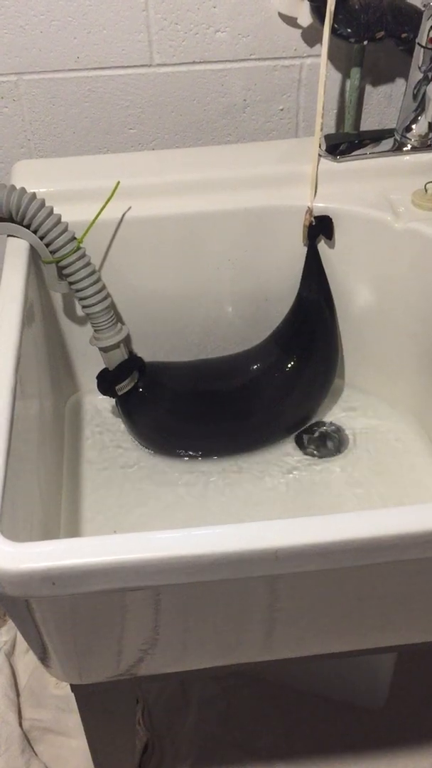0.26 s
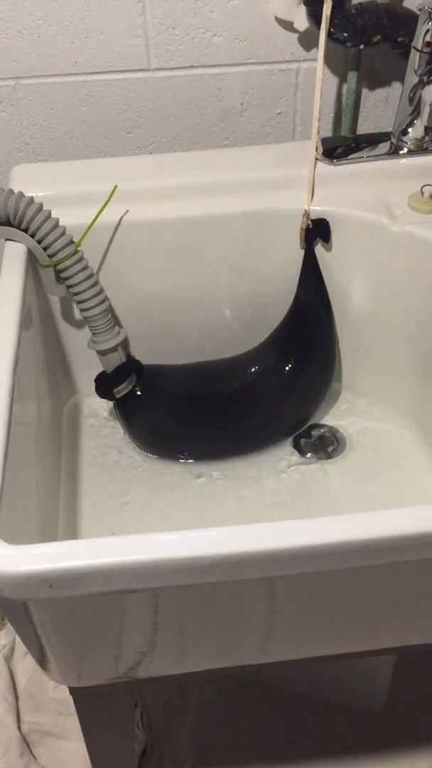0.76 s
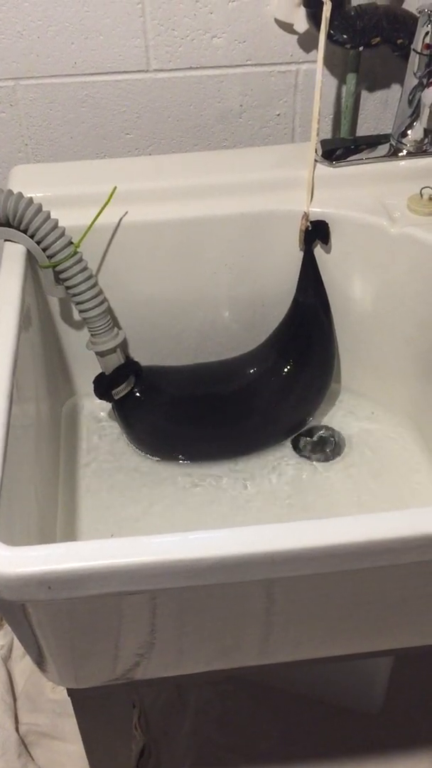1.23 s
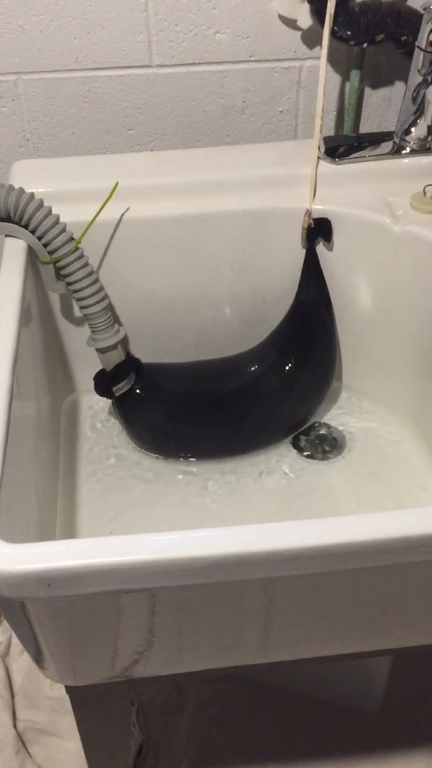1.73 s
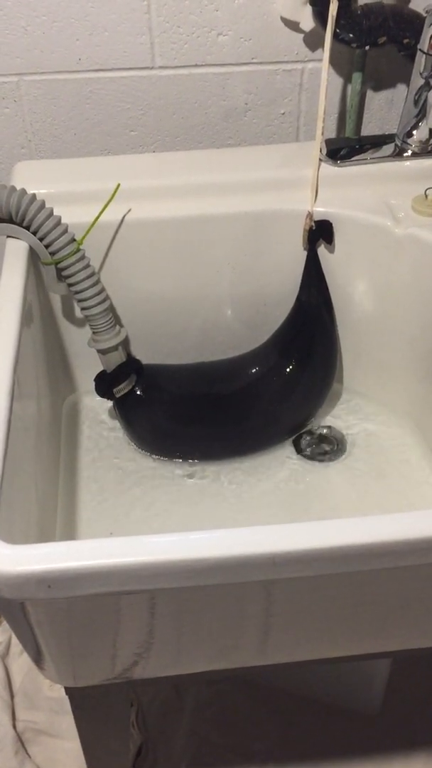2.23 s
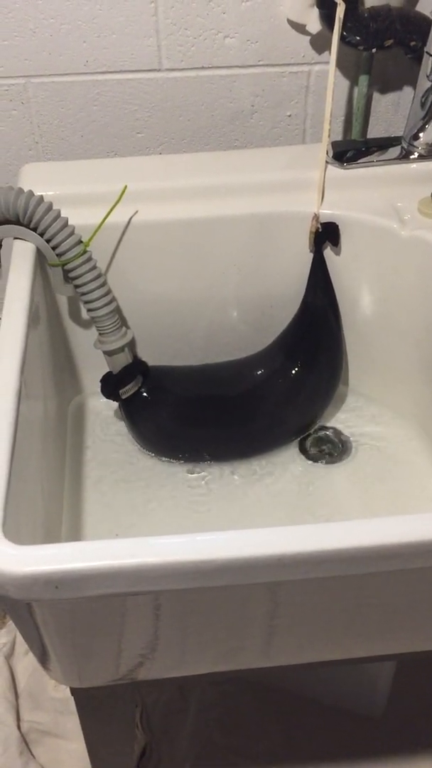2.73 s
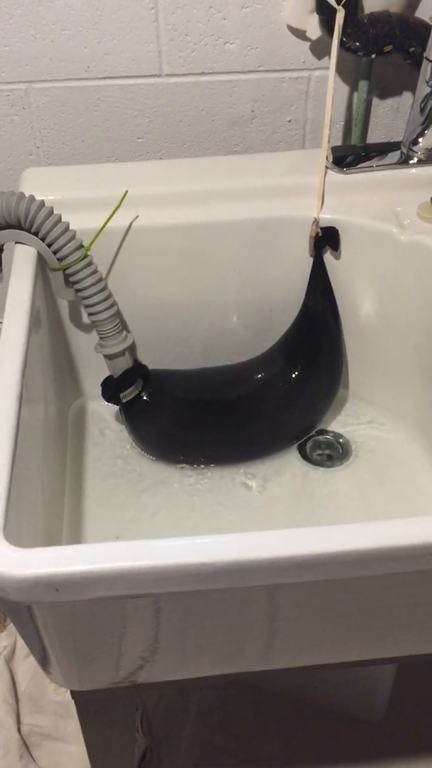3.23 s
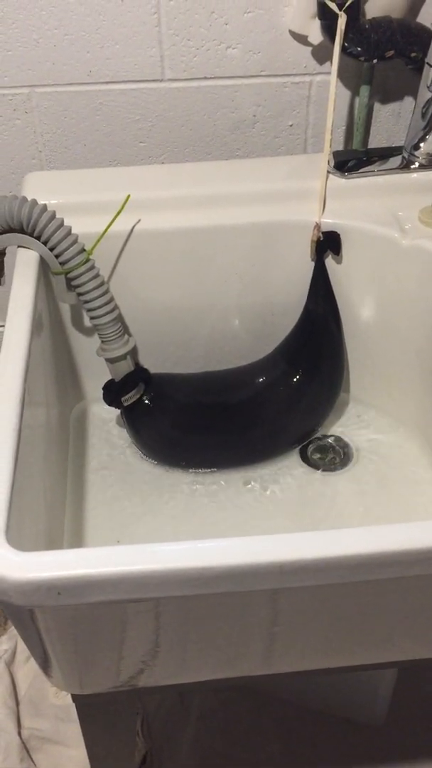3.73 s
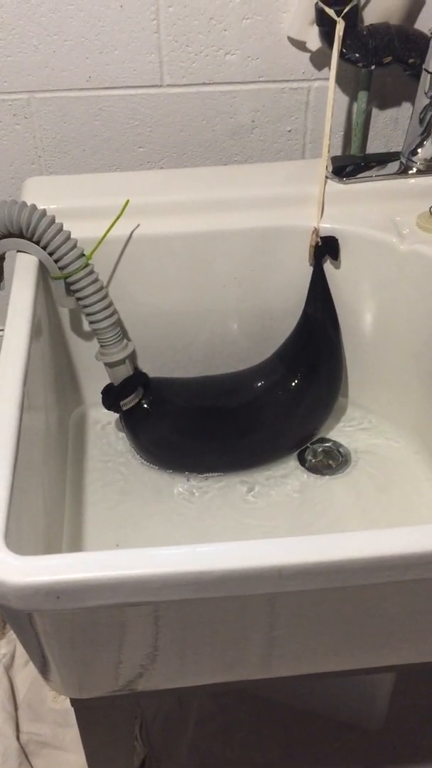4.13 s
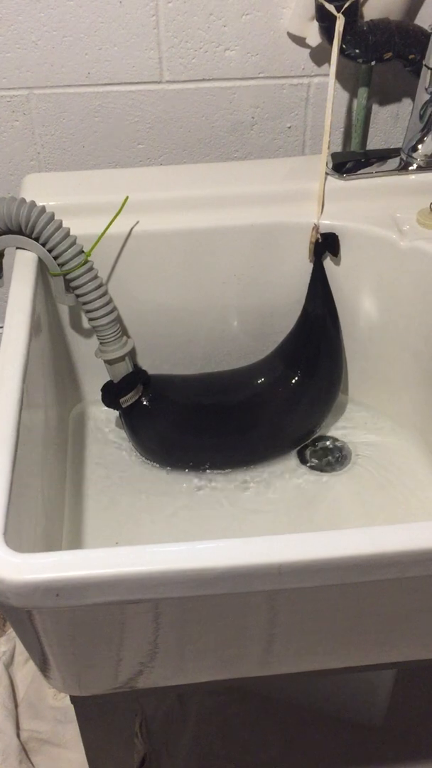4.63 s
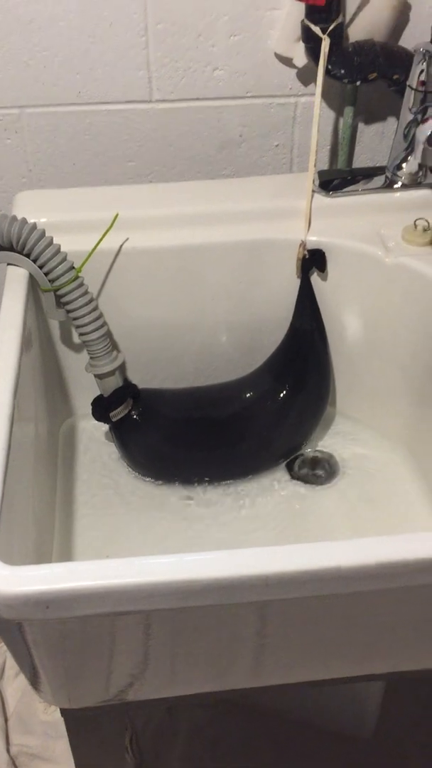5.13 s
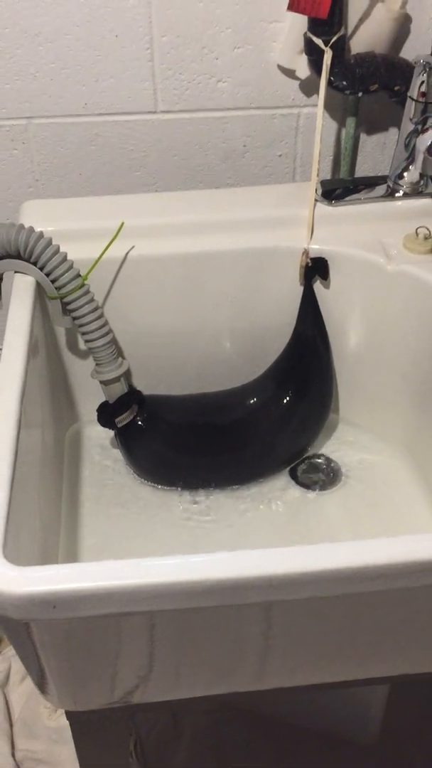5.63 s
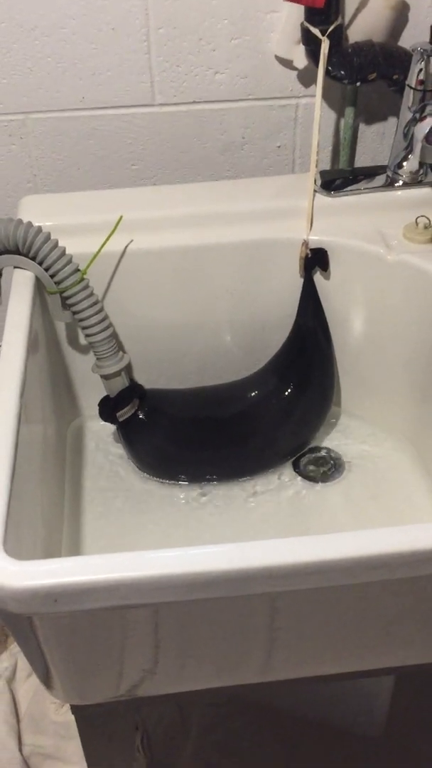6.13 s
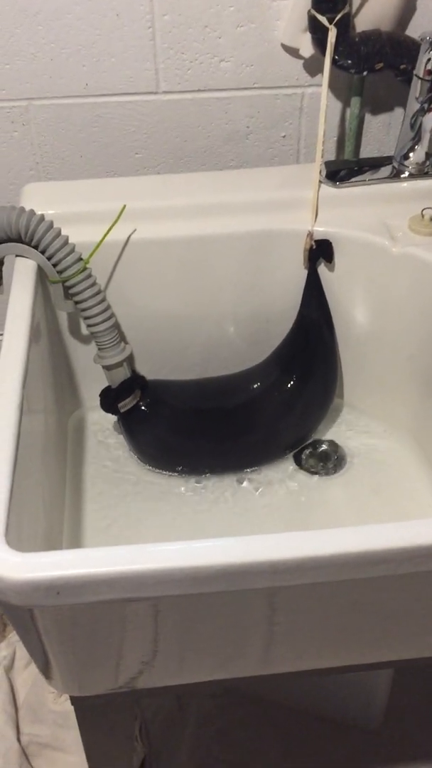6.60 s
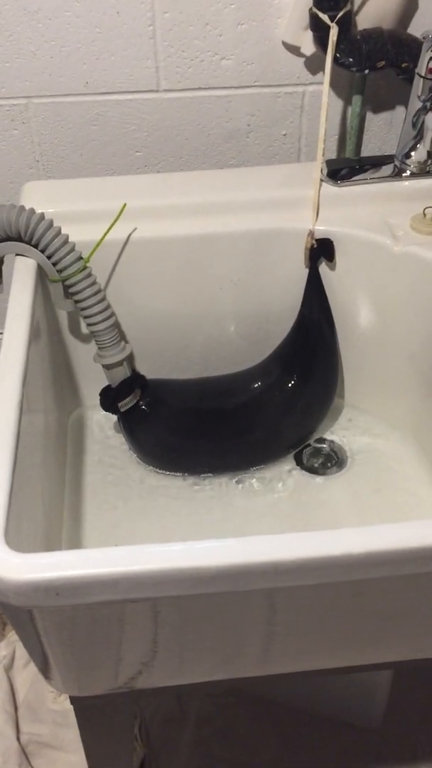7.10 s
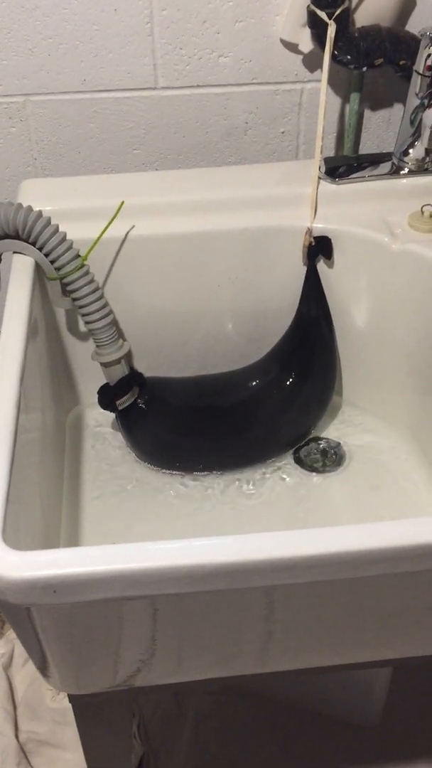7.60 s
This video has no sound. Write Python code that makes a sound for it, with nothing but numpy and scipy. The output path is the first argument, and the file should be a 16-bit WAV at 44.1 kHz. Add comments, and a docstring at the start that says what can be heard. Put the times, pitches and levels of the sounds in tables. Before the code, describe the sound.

Drain water runs fizzing from a hose into a laundry tub over a motor's bass hum, air spitting, cracking and gurgling at intervals.

```python
"""A washing machine's drain pump hums (60 Hz harmonics) and churns water; its hose trickles into a plastic sink.
From the start, faint bubbles drip and gurgle; loud plips and bursting films follow, snapping until 2.1 s.
After a sparser lull, gulps of air glug as bubble clouds near 5 s, and snaps and glugs return near 6.8 s.
Air in the hose spits through a soaked lint sock: cracks, decaying rings and rising bubble tones.
Decaying noise and fixed tub resonances ring behind the water, as plastic walls and a small masonry room."""
import sys
import numpy as np
from scipy import signal
from scipy.fft import rfft, irfft, next_fast_len
from scipy.io import wavfile
from scipy.ndimage import uniform_filter1d, map_coordinates

SR = 44100
rng = np.random.default_rng(int(sys.argv[2]) if len(sys.argv) > 2 else 0)


def materialize(psi):
    """Save the field psi as 16-bit PCM at rate SR to the path in sys.argv[1].

    A 1-D psi becomes a single channel; in a 2-D psi each row is a channel.
    """
    bounded = np.clip(np.atleast_2d(psi).T, -1, 1)
    quanta = np.round(bounded * 32767).astype(np.int16)
    wavfile.write(sys.argv[1], SR, quanta)


N = 346626  # length [samples]

# Pump harmonics: (frequency [Hz], rms level before HUM_GAIN_DB [dB])
PUMP_LINES = [(60, -63), (120, -43), (180, -72.5), (240, -69.5), (300, -65), (360, -75), (480, -75.5),
              (660, -89)]
# Chance moments when the hum and low noise partly cancel: (time [s], depth [dB])
HUM_CANCELLATIONS = [(1.12, 5), (3.08, 3), (3.32, 6), (5.58, 8), (7.43, 7), (7.66, 7)]
# Water churning in the machine: (time [s], level before CHURN_GAIN_DB [dB])
CHURN_LEVEL = [(0, -49), (.6, -54), (1.1, -47), (1.45, -52.5), (1.95, -50.5), (2.8, -53.5), (7.86, -53)]
# Running water: (time [s], level before the layer gains [dB])
TRICKLE_LEVEL = [(0, -50.5), (.7, -53), (1.15, -48), (1.6, -51.5), (2.1, -50.5), (3.3, -52.5), (4.7, -55.5),
                 (5.1, -51.5), (5.8, -56.5), (7, -54), (7.86, -55)]
# Loud single bubbles: (time [s], level before PLIP_GAIN_DB [dB], pitch [Hz])
LOUD_PLIPS = [(0.1507, -30.5, 2670), (0.247, -37, 5070), (0.2833, -32, 2430), (0.5342, -30.5, 4030),
              (0.5521, -35.5, 3300), (0.7233, -25, 4360), (0.728, -28, 2770), (1.2371, -35.5, 2755),
              (1.7918, -23.5, 2390), (1.9248, -23, 2550), (1.953, -27, 4300), (2.0366, -30.5, 2830),
              (2.0753, -28, 3410), (2.1883, -25.5, 2330), (2.3359, -32.5, 4200), (2.3703, -25.5, 2590),
              (2.441, -25.5, 4030), (3.7755, -42.5, 3570), (3.9346, -38.5, 3420), (4.0946, -46, 2220),
              (4.263, -37.5, 3980), (4.8852, -33, 2850), (5.001, -27, 2250), (5.0086, -27, 3300),
              (5.02, -24.5, 3370), (6.1037, -40.5, 1620), (6.4804, -40, 2035), (6.7469, -18, 2850),
              (6.8047, -25.5, 2640), (7.2294, -42, 970), (7.5534, -45.5, 2170)]
# Films bursting at the outlet: (time [s], crack level before CRACK_GAIN_DB [dB],
# air-pocket ring level [dB], spit relative to crack before SPIT_GAIN_DB [dB])
LOUD_SNAPS = [(0.2977, -40, -25.5, -5), (0.3065, -37.5, -31, -5), (0.317, -37.5, -27, -15),
              (0.339, -37.5, -39, -11), (0.399, -39, -25, -11), (0.411, -39, -34, -10),
              (0.5333, -41, -41, -31), (0.723, -33, -45, -14), (0.728, -35, -44, -20),
              (0.7576, -35, -29.5, -24), (0.763, -30, -40, -25), (0.7746, -34.5, -31, -16),
              (0.793, -47, -25, -20), (0.8253, -35, -24, -23), (0.8314, -39.5, -36, -5),
              (0.853, -38, -37, -20), (0.8591, -35.5, -20, 1), (0.9979, -27.5, -23, -22),
              (1.0023, -36, -21.5, -5), (1.285, -44, -22, -15), (1.298, -45, -32, -21),
              (1.3138, -35.5, -27, -13), (1.3228, -36, -40, -22), (1.363, -38, -32, -18),
              (1.3794, -42.5, -42, -23), (1.4794, -42, -26.5, -23), (1.791, -33.5, -30, -19),
              (1.9222, -37, -26, -17), (1.952, -40, -50, -20), (1.9868, -41, -30, -2),
              (2.0061, -36, -28.5, -27), (2.0906, -40.5, -31, -24), (4.8884, -42, -31.5, -18),
              (4.9799, -33.5, -20.5, -8), (4.9927, -27, -27, -6), (4.998, -33.5, -36, 1),
              (5.0123, -42, -30, -2), (6.7945, -33.5, -28, -5.5), (6.802, -30, -31, -13),
              (6.8976, -38, -33, 0), (6.9033, -47, -24.5, 8)]
# Spells of sputtering air: (start [s], end [s], small-snap level before CRACK_GAIN_DB [dB],
# small-glug level before GLUG_GAIN_DB [dB], glug centre [Hz])
SPUTTER_SPELLS = [(0.283, 0.434, -55, -60, 2140), (0.746, 0.873, -43.5, -49, 2400),
                  (1.049, 1.45, -54, -47, 1650), (1.901, 2.14, -53, -46, 2410),
                  (3.722, 4.424, -77, -58.5, 3310), (5.09, 5.249, -68, -48.5, 1860),
                  (5.601, 5.69, -59, -45, 2230), (6.047, 6.601, -64, -55, 2015),
                  (6.801, 7.618, -68, -52, 2340)]
# Gulps breaking into bubble clouds: (time [s], level before GLUG_GAIN_DB [dB], centre [Hz], spread [octaves])
LOUD_GLUGS = [(0.9, -38, 1920, 0.17), (1.644, -46, 1930, 0.48), (1.863, -40.5, 1560, 0.17),
              (2.043, -40.5, 2420, 0.32), (2.272, -44, 1057, 0.47), (2.301, -44, 2130, 0.53),
              (4.931, -38.5, 2080, 0.29), (4.997, -30.5, 2610, 0.43), (5.066, -31, 1840, 0.183),
              (5.109, -37.5, 2080, 0.15), (5.185, -37.5, 1850, 0.16), (5.301, -38.5, 1390, 0.54),
              (5.353, -35.5, 1480, 0.31), (5.569, -33.5, 1660, 0.24), (6.83, -37, 2530, 0.23),
              (6.9, -33.5, 2640, 0.23), (6.997, -38.5, 1220, 0.33), (7.028, -39, 1906, 0.13),
              (7.323, -39, 1377, 0.36), (7.342, -39.5, 1520, 0.3), (7.4, -39.5, 1754, 0.25),
              (7.432, -44.5, 1680, 0.56)]

# Low rumble spectrum: (frequency [Hz], relative level [dB])
RUMBLE_SPECTRUM = [(20, -38), (30, -29), (40, -28), (60, -8), (70, -4.5), (83, -0.5), (100, -17),
                   (140, -18), (500, -48.5)]
# Churned-water spectrum: (frequency [Hz], relative level [dB])
CHURN_SPECTRUM = [(60, -37), (110, 4), (135, 3), (170, 4), (230, -5.5), (320, -6.5), (420, -18), (560, -36),
                  (660, -30.5), (800, -46), (1200, -31), (4000, -82)]
# Fizz and wash spectrum: (frequency [Hz], relative level [dB])
TRICKLE_SPECTRUM = [(300, -15), (460, 16), (570, 10.5), (650, 4.5), (760, -3), (950, 10), (1250, -5.5),
                    (1650, -3.5), (3500, -1.5), (5000, -2.5), (9000, -9.5), (10400, -12.5), (12000, -9.5),
                    (17000, -24)]
# Spray mist spectrum: (frequency [Hz], relative level [dB])
MIST_SPECTRUM = [(2000, -34), (4000, -5), (6500, 7), (7800, -34), (9000, 14), (10400, -9), (12000, -10),
                 (14000, 1), (17000, 4)]
# Film crack spectrum: (frequency [Hz], relative level [dB])
CRACK_SPECTRUM = [(150, -105), (600, -24), (1700, -17.5), (2300, 13), (3600, 2), (4600, 10.5), (5900, 0),
                  (6900, 5), (7700, -14), (8700, 1.5), (10200, -23), (12000, -37), (17000, -36)]
# Spit of spray spectrum: (frequency [Hz], relative level [dB])
SPIT_SPECTRUM = [(3000, -62), (8000, 4), (10300, -5.5), (12000, 1.5), (15000, -9), (17000, -11)]
# Glug splash spectrum: (frequency [Hz], relative level [dB])
SPLASH_SPECTRUM = [(300, -3), (600, 2.5), (1000, 13.5), (1700, 1.5), (3500, 6.5), (4500, -6), (7000, -21),
                   (16000, -47)]
# Tub reflection decay: (frequency [Hz], t60 [s])
TUB_DECAY = [(500, 0.12), (2500, 0.064), (10000, 0.049)]
# Room decay: (frequency [Hz], t60 [s])
ROOM_DECAY = [(400, 0.35), (1400, 0.29), (3500, 0.2), (9000, 0.14), (16000, 0.1)]
# Standing waves of the tub: (frequency [Hz], relative level [dB])
TUB_MODES = [(1308, 7), (1389, -21.5), (1702, 10), (1791, -17), (2020, -27), (2153, 5), (2214, 10.5),
             (2354, 10.5), (2409, 6), (2840, 5), (3032, 8.5)]

HUM_GAIN_DB, HUM_WAVER_DB, CANCEL_HALF_WIDTH_S = 1, 0.75, .022  # half width to 1/e of the depth
WHINE_HZ = 15822
CHURN_GAIN_DB, CHURN_SWING_DB = 1, 2
PLIP_GAIN_DB, PLIP_SWELL_CYCLES = 4.5, 2.47  # cycles to the peak
DRIPS_PER_S, DRIP_DB, DRIP_LOW_HZ, DRIP_HIGH_HZ = 22, -51.5, 1243, 4610
GURGLES_PER_S, GURGLE_DB, GURGLE_LOW_HZ, GURGLE_HIGH_HZ = 10, -58, 540, 1152
FAINT_SCATTER_DB, FAINT_SWELL_CYCLES = 1.5, 7.1  # drips and gurgles
CRACK_GAIN_DB, SPIT_GAIN_DB = 24.5, -4.5
POCKET_HZ, POCKET_SCATTER_OCTAVES = 2450, 0.085
SPUTTER_SCATTER_DB, SMALL_SNAPS_PER_S, SMALL_GLUGS_PER_S = 3, 30, 11
SMALL_RING_DB, SMALL_SPIT_DB = 12.5, -18  # ring re the spell's snap level; spit before SPIT_GAIN_DB
GLUG_S, GLUG_GAIN_DB, SMALL_GLUG_OCTAVES = .021, -1, 0.372
TOP_HZ = 17300


def amp(db):
    """Decibels to gain."""
    return 10 ** (np.asarray(db) / 20)


def unit(x):
    """x at rms 1."""
    return x / np.sqrt(np.mean(x ** 2) + 1e-20)


def along(points, hz):
    """(Hz, value) points interpolated on a log-frequency axis."""
    f, v = np.transpose(points)
    return np.interp(np.log(hz + 1), np.log(f + 1), v)


def clock(seconds):
    """Sample times [s] of a stretch."""
    return np.arange(int(seconds * SR)) / SR


def curve(rows):
    """One value per sample from (s, value) rows."""
    s, value = np.transpose(rows)
    return np.interp(np.arange(N) / SR, s, value)


def wobble(knots_per_s):
    """A smooth random curve."""
    knots = rng.standard_normal(int(N * knots_per_s / SR) + 4)
    return map_coordinates(knots, [np.arange(N) * knots_per_s / SR])


def moments(start_s, end_s, per_s):
    """Loosely spaced times at about the given rate, at least one."""
    count = max(1, round((end_s - start_s) * per_s))
    return start_s + (end_s - start_s) * (np.arange(count) + rng.random(count)) / count


def filtered(x, response):
    """x times a response of frequency."""
    m = next_fast_len(N + SR // 2)
    return irfft(rfft(x, m) * response(np.fft.rfftfreq(m, 1 / SR)), m)[:N]


def coloured_noise(spectrum):
    """White noise shaped by a spectrum, at rms 1."""
    return unit(filtered(rng.standard_normal(N), lambda hz: amp(along(spectrum, hz))))


def impulse(spectrum, size=512):
    """Minimum-phase click with this spectrum, at energy 1."""
    cepstrum = irfft(np.log(amp(along(spectrum, np.fft.rfftfreq(size, 1 / SR)))))
    cepstrum[1:size // 2] *= 2  # fold to causal
    cepstrum[size // 2 + 1:] = 0
    click = irfft(np.exp(rfft(cepstrum)))
    return click / np.linalg.norm(click)


def add(track, s, sound):
    """Mix a sound into the track at time s."""
    start = int(np.clip(round(s * SR), 0, N))
    track[start:start + len(sound)] += sound[:N - start]


def tail(decays, size=128, count=220):
    """Diffuse echo of energy 1: noise whose frequencies decay at their own speeds."""
    hz = np.fft.rfftfreq(size, 1 / SR)
    t = np.arange(count) * size / 2 / SR
    z = rng.standard_normal((len(hz), count)) + 1j * rng.standard_normal((len(hz), count))
    echo = signal.istft(z * amp(-60 * t / along(decays, hz)[:, None]), nperseg=size)[1]
    echo *= np.clip(np.arange(len(echo)) / SR / .002 - .5, 0, 1)  # fades in from 1 to 3 ms
    return echo / np.linalg.norm(echo)


def hollow(size, t60_s=0.17):
    """Decaying standing waves of the tub at energy 1, with levels and phases drawn per call."""
    t = np.arange(size) / SR
    ring = sum(amp(db + 2 * rng.standard_normal()) * np.sin(2 * np.pi * (hz * t + rng.random()))
               for hz, db in TUB_MODES)
    ring *= amp(-60 * t / t60_s)
    return ring / np.linalg.norm(ring)


def in_sink(sound, tub_db, room_db):
    """Direct sound plus tub reflections, room tail and tub ring, drawn afresh per call."""
    room = tail(ROOM_DECAY)
    path = amp(tub_db) * tail(TUB_DECAY) + amp(room_db) * (room + amp(-9.5) * hollow(len(room)))
    path[0] += 1  # direct
    return signal.fftconvolve(sound, path)


def bubbles(starts_s, hz, sizes, cycles, glide, length, size=600):
    """Damped bubble tones that rise in pitch as they near the surface."""
    turns = hz[:, None] * np.arange(size) / SR
    age = turns / cycles
    envelope = sizes[:, None] * age * np.exp(-age)
    tones = envelope * np.sin(2 * np.pi * turns * (1 + glide * np.minimum(age, 10)))
    tones *= np.linspace(1, 0, size)
    where = (starts_s * SR).astype(int)[:, None] + np.arange(size)
    return np.bincount(where.ravel(), tones.ravel(), length)


def pump_hum():
    """Motor harmonics with shared phase sway and level waver, weaker where low noise partly cancels them."""
    t = np.arange(N) / SR
    sway = .07 * wobble(9)
    hum = sum(amp(db) * np.sqrt(2) * np.sin(2 * np.pi * (hz * t + rng.random()) + sway)
              for hz, db in PUMP_LINES)
    cancel_db = sum(depth * np.exp(-((t - s) / CANCEL_HALF_WIDTH_S) ** 2) for s, depth in HUM_CANCELLATIONS)
    return amp(HUM_GAIN_DB + HUM_WAVER_DB * wobble(18) - cancel_db) * hum


def pump_whine():
    """Thin electric whine: one faint high sine, with flicker from audio coding."""
    t = np.arange(N) / SR
    return amp(-76.5 + 2.2 * wobble(14)) * np.sin(2 * np.pi * WHINE_HZ * t + 1.3 * wobble(35))


def machine_churn():
    """Churned water as low noise of uneven level, over a steadier rumble."""
    rumble = amp(-56.5 + 0.53 * wobble(6)) * coloured_noise(RUMBLE_SPECTRUM)
    level_db = curve(CHURN_LEVEL) + CHURN_GAIN_DB + CHURN_SWING_DB * wobble(10)
    return rumble + amp(level_db) * coloured_noise(CHURN_SPECTRUM)


def scatter(count, low_hz, high_hz, spread_db, cycles, glide):
    """Tub-floor bubbles of random moment, pitch and size, heard in the sink."""
    when, pitch, strength = rng.random((count, 3)).T
    hz = low_hz * (high_hz / low_hz) ** pitch
    sizes = amp(spread_db * np.minimum(-np.log(1 - strength), 4)) * np.sqrt(hz)
    grains = bubbles(when * N / SR, hz, sizes, cycles, glide, N)[:N]
    return in_sink(grains, tub_db=-2.5, room_db=0.5)[:N]


def patchy(x, depth_db, size=256):
    """Puffs and lulls, each about 1 kHz wide and a few hundredths of a second long."""
    z = signal.stft(x, nperseg=size)[2]
    field = uniform_filter1d(rng.standard_normal(z.shape), size=6, axis=0)
    field = uniform_filter1d(field, size=13, axis=1)
    return unit(signal.istft(z * amp(depth_db * unit(field)), nperseg=size)[1][:N])


def trickle():
    """Thin sheet of water: bubble fizz and rounder babble, on noise wash and spray mist."""
    fizz = scatter(count=5500, low_hz=1093, high_hz=13860, spread_db=4.5, cycles=2.67, glide=0.016)
    fizz = unit(filtered(fizz, lambda hz: amp(along(TRICKLE_SPECTRUM, hz))))
    babble = unit(scatter(count=760, low_hz=598, high_hz=2434, spread_db=2.5, cycles=3.2, glide=0.007))
    wash = patchy(coloured_noise(TRICKLE_SPECTRUM), depth_db=2)
    mist = patchy(coloured_noise(MIST_SPECTRUM), depth_db=5)
    water = amp(-4.5) * fizz + amp(-10) * babble + amp(-10) * wash
    return amp(curve(TRICKLE_LEVEL)) * water + amp(-72.5) * mist


def plip(db, hz, cycles, rise_per_s):
    """A single bubble swells as it pinches off, rises in pitch and dies away."""
    t = clock(.05)
    age = t * hz / cycles
    shape = age ** 2 * np.exp(2 * (1 - age))  # peaks at age 1
    tone = amp(db) * shape * np.sin(2 * np.pi * hz * t * (1 + rise_per_s * t))
    return in_sink(tone, tub_db=-8.5, room_db=-5.5)


def faint_bubbles(per_s, db, low_hz, high_hz):
    """Faint, longer bubbles of random pitch throughout."""
    track = np.zeros(N)
    for s in moments(0, N / SR, per_s):
        hz = low_hz * (high_hz / low_hz) ** rng.random()
        level_db = db + FAINT_SCATTER_DB * rng.standard_normal()
        add(track, s, plip(level_db, hz, FAINT_SWELL_CYCLES, rise_per_s=1.62))
    return track


def drips():
    """Faint bubbles in the water running to the drain."""
    return faint_bubbles(DRIPS_PER_S, DRIP_DB, DRIP_LOW_HZ, DRIP_HIGH_HZ)


def gurgles():
    """Soft low bubbles in the drain."""
    return faint_bubbles(GURGLES_PER_S, GURGLE_DB, GURGLE_LOW_HZ, GURGLE_HIGH_HZ)


def plips():
    """Loud short bubbles at the outlet."""
    track = np.zeros(N)
    for s, db, hz in LOUD_PLIPS:
        add(track, s, plip(db + PLIP_GAIN_DB, hz, PLIP_SWELL_CYCLES, rise_per_s=0.97))
    return track


def snaps():
    """A film bursts with a crack and a spit of spray; the air pocket behind it rings."""
    track, t = np.zeros(N), clock(.015)
    click, spit = impulse(CRACK_SPECTRUM), impulse(SPIT_SPECTRUM)
    ring_fade = np.exp(-t / .0019)
    small = [(s, db + SPUTTER_SCATTER_DB * rng.standard_normal(), db + SMALL_RING_DB, SMALL_SPIT_DB)
             for start, end, db, _, _ in SPUTTER_SPELLS for s in moments(start, end, SMALL_SNAPS_PER_S)]
    for s, db, ring_db, spit_db in LOUD_SNAPS + small:
        hz = POCKET_HZ * 2 ** (POCKET_SCATTER_OCTAVES * rng.standard_normal())
        burst = .15 * rng.standard_normal(len(t)) * np.exp(-t / .0004)
        burst[0] += 1
        burst[int(SR * (.0003 + .0004 * rng.random()))] -= .7  # tub-floor echo
        burst /= np.linalg.norm(burst)
        colour = click + amp(spit_db + SPIT_GAIN_DB) * spit
        crack = amp(db + CRACK_GAIN_DB) * np.convolve(burst, colour)[:len(t)]
        ring = amp(ring_db) * np.sin(2 * np.pi * hz * t) * ring_fade
        add(track, s, in_sink(crack + ring, tub_db=-8.5, room_db=-6))
    return track


def glugs(count=15):
    """Each gulp of air sheds a quick bubble cloud and a wet splash, strongly reflected in the tub."""
    track, droplet, span = np.zeros(N), impulse(SPLASH_SPECTRUM), int(GLUG_S * SR)
    small = [(s, db + SPUTTER_SCATTER_DB * rng.standard_normal(), hz, SMALL_GLUG_OCTAVES)
             for start, end, _, db, hz in SPUTTER_SPELLS for s in moments(start, end, SMALL_GLUGS_PER_S)]
    for s, db, hz, spread in LOUD_GLUGS + small:
        pitches = hz * 2 ** (spread * rng.standard_normal(count))
        starts_s = rng.random(count) ** 1.4 * GLUG_S * 0.74  # crowded early
        sizes = amp(2 * rng.standard_normal(count))
        cloud = bubbles(starts_s, pitches, sizes, cycles=3.1, glide=0.011, length=span)
        splash = np.convolve(rng.standard_normal(span) ** 3, droplet)[:len(cloud)]
        cloud = cloud / np.std(cloud[:span])
        cloud[:len(splash)] += spread * splash / np.std(splash[:span])  # wider spread, more splash
        cloud = in_sink(cloud, tub_db=-2.5, room_db=-3)
        add(track, s, amp(db + GLUG_GAIN_DB) * cloud / np.std(cloud[:span]))
    return track


def scene():
    """Pump, running water and sputtering air, summed to one channel."""
    machine = pump_hum() + pump_whine() + machine_churn()
    water = trickle() + drips() + gurgles() + plips() + snaps() + glugs()
    return (machine + water)[None]


def record(dry):
    """The recorder keeps nothing at or above its band limit."""
    return filtered(dry[0], lambda hz: hz < TOP_HZ)[None]


dry = scene()
out = record(dry)
materialize(out)
```